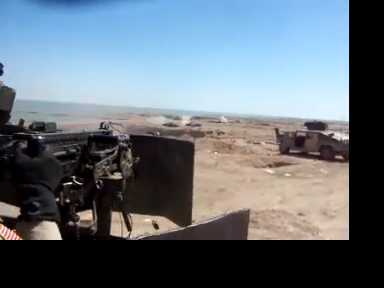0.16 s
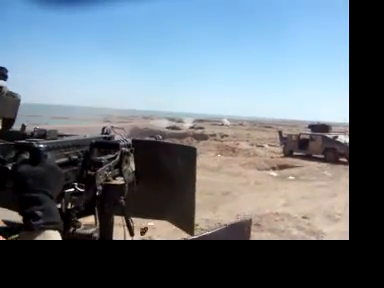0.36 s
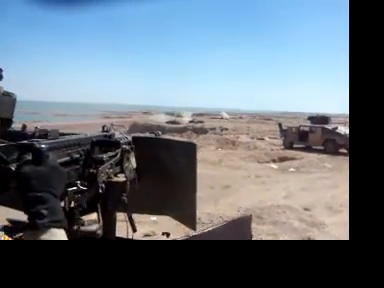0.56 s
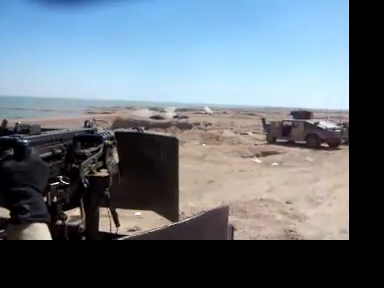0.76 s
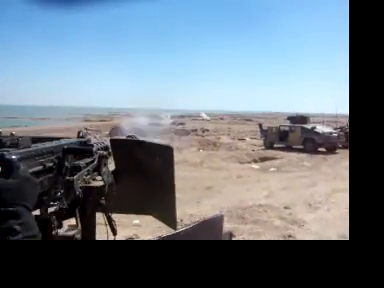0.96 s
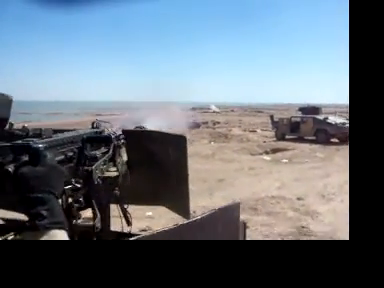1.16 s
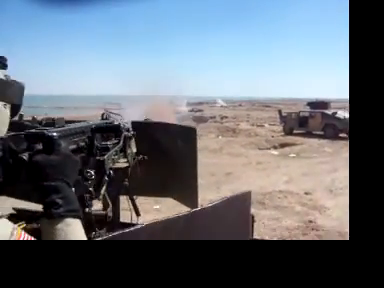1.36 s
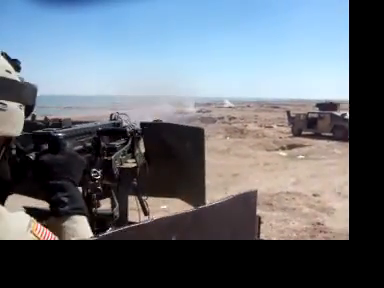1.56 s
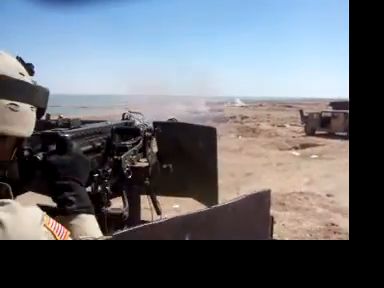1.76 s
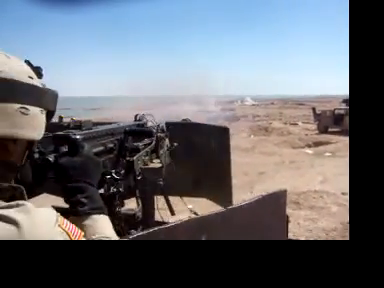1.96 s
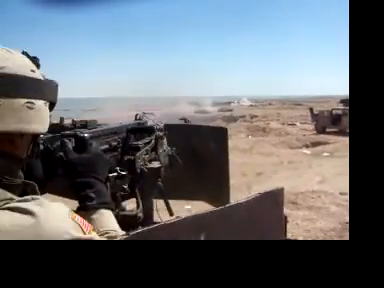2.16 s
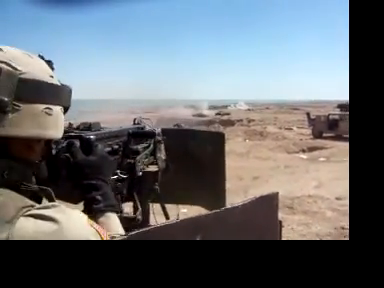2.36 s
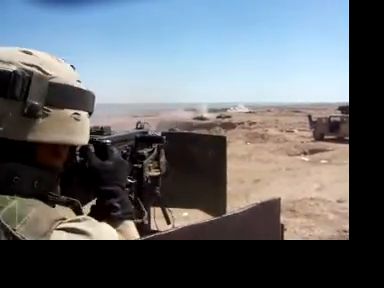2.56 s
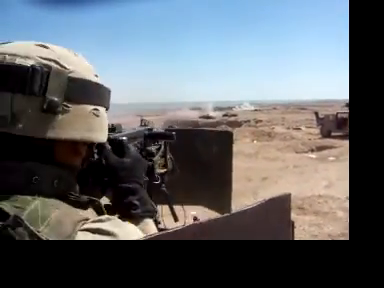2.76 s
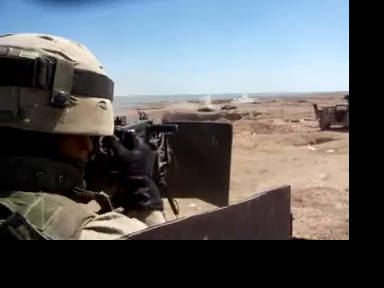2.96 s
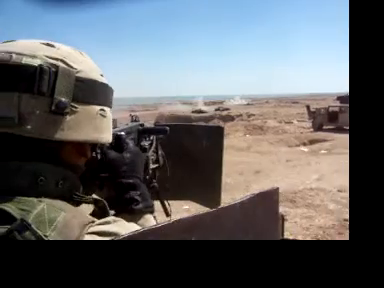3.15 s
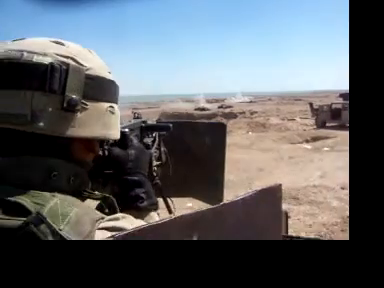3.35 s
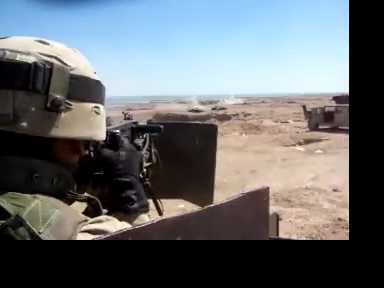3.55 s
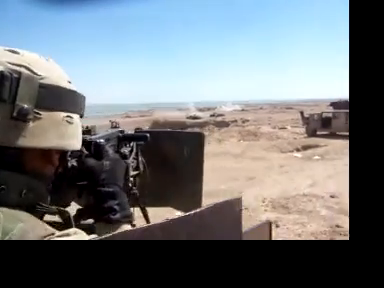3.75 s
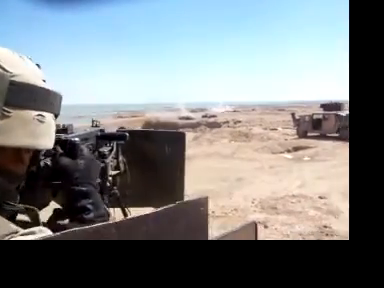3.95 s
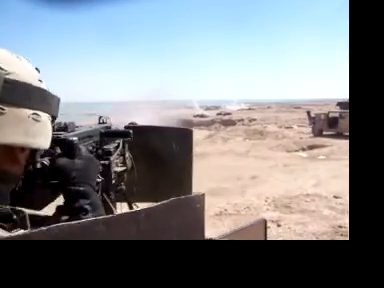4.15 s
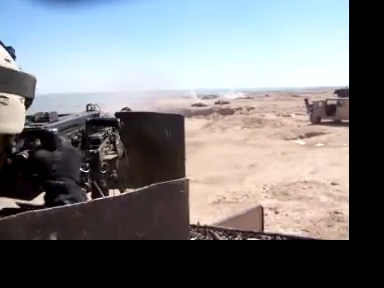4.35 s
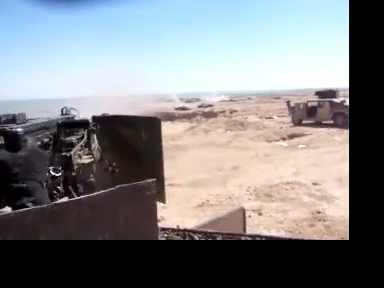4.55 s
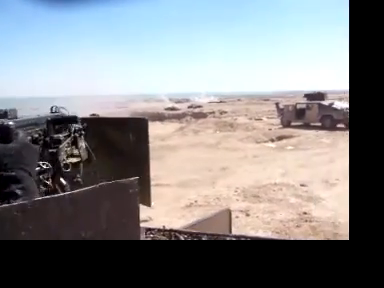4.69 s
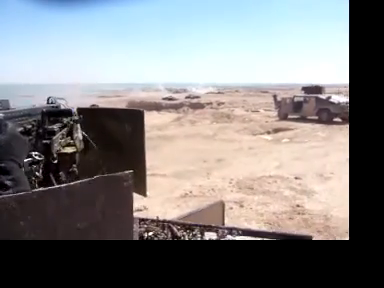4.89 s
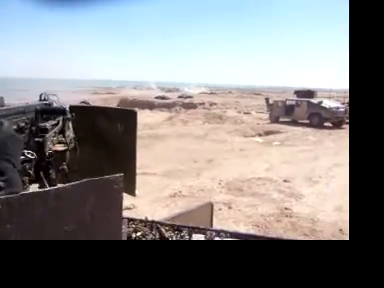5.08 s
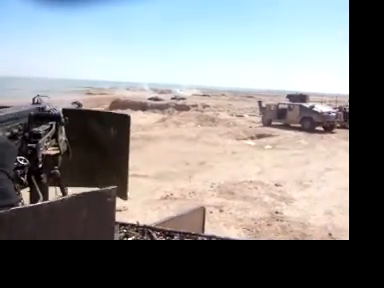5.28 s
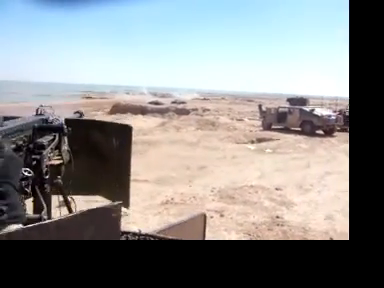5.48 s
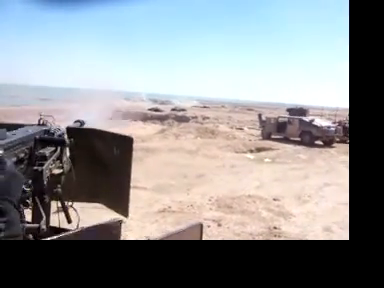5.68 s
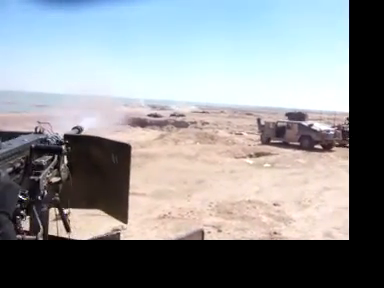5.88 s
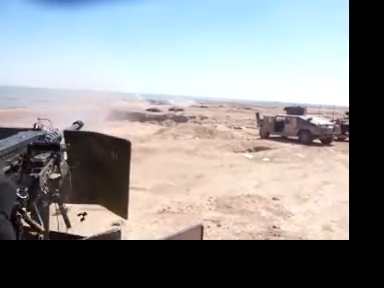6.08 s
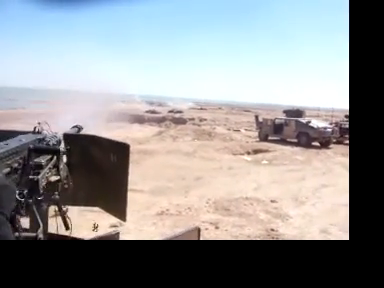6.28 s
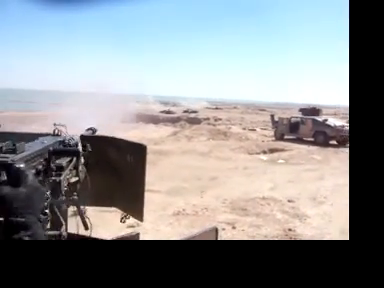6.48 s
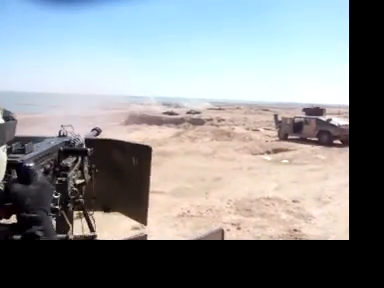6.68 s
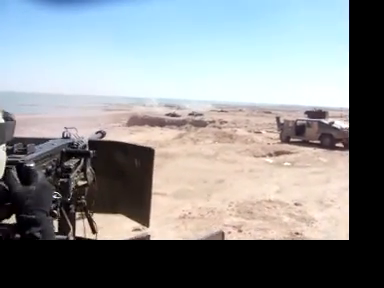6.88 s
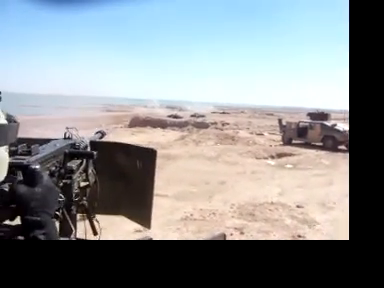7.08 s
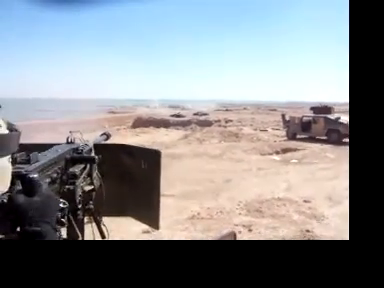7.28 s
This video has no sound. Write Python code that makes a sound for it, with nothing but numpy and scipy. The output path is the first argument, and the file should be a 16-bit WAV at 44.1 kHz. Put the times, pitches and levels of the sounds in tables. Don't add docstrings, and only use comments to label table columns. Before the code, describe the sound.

A mounted heavy gun hammers ten shots, then five, then nine, distorting a close small microphone, with spent cases and links tinkling on armour between bursts.

```python
import sys
import numpy as np
from scipy import signal
from scipy.fft import rfft, irfft
from scipy.io import wavfile
from scipy.ndimage import uniform_filter1d

SR = 44100
rng = np.random.default_rng(int(sys.argv[2]) if len(sys.argv) > 2 else 0)


def decibels_to_gain(level_db):
    exponent = np.asarray(level_db, float) / 20
    return 10 ** exponent


def generate_wav(sig):
    pcm = np.round(np.clip(np.atleast_2d(sig).T, -1, 1) * 32767).astype(np.int16)
    wavfile.write(sys.argv[1], SR, pcm)


N = 324135

# [start_s, level_db]
WIND = [
    (0, -38),
    (.9, -39),
    (2.4, -33),
    (2.8, -35),
    (3.1, -45),
    (3.28, -36),
    (3.6, -41),
    (3.95, -40),
    (5.5, -44),
    (7.35, -35),
]
# [freq_hz, level_db per Hz]
RUMBLE_COLOUR = [(12, -21.5), (20, 5), (48, -3), (81, 2), (141, 1.5), (203, -1), (335, -9), (403, -14.5),
                 (600, -15), (780, -35.5), (1320, -120)]
# [freq_hz, level_db per Hz]
SHELL_COLOUR = [(180, -31.5), (300, 1.5), (396, -6.5), (684, -1), (818, -6.5), (894, -1.5), (1140, -1),
                (1490, -8.5), (1760, -20), (1890, -12), (2630, -3), (3220, -14), (3800, -11.5), (4300, 0),
                (5590, -60.5), (9460, -120)]
# [end_s, echo_db, clatter_db, clatter_fade_db_per_s, settled_s after the end]
BURST_ENDS = [
    (-.08, 1, -19, 28, .92),
    (2.17, -5, -23, 22, 1.28),
    (4.7, -4.5, -19.5, 22, .78),
    (6.659, -4, -18.5, 17, .6),
]
# [echo_db, echo_fade_db_per_s, clatter_db, clatter_fade_share 0-1, resting_db]
LOW_LAYER = (-1, 135, .5, 0.88, -59.5)
MID_LAYER = (-8.5, 158, -0.5, 1.02, -55)
TOP_LAYER = (-13.5, 165, -6.5, 1, -71.5)

# [start_s, peak_db, pitch_hz, t60_s]
CASES = [(.059, -8, 1210, .04), (.117, -17, 1150, .09), (.164, -9, 1330, .03), (.26, -10, 1190, .036),
         (.47, -9, 1340, .05), (.497, -11, 1110, .054), (.584, -17, 1090, .03), (2.187, -15, 1250, .1),
         (2.278, -2, 1110, .066), (2.307, -9.5, 1200, .081), (2.333, -9, 1200, .082),
         (2.433, -8, 1150, .078), (2.459, -9.5, 1030, .065), (2.57, -19, 1180, .13),
         (2.979, -30, 1290, .07), (3.057, -23, 1230, .06), (3.413, -28, 1040, .045),
         (4.904, -8, 1320, .058), (4.974, -7, 910, .15), (5.024, 1.5, 1130, .065), (5.113, -4, 1120, .034),
         (5.184, -13, 1000, .09), (5.247, -15, 982, .12), (6.752, -12, 1020, .07), (6.814, -9, 1130, .043),
         (6.832, -3, 902, .068), (6.915, -17, 964, .1), (6.958, -13, 1020, .09), (6.979, -8, 1030, .054),
         (7.081, -5.5, 1100, .14)]
# [start_s, peak_db, pitch_hz, t60_s]
LINKS = [(.092, -24, 2830, .06), (.307, -23, 2470, .074), (.362, -14, 2720, .03), (.403, -28, 2720, .056),
         (.584, -21, 2450, .03), (2.187, -8, 2740, .12), (2.232, -10, 2930, .034), (2.278, -16, 2580, .066),
         (2.382, -19, 2370, .039), (2.433, -9, 2380, .078), (2.502, -10, 2520, .039),
         (2.824, -21, 3030, .041), (2.888, -21, 2800, .037), (3.057, -20, 2860, .066),
         (3.176, -39, 2180, .055), (3.287, -44, 2500, .08), (3.413, -38, 2640, .05),
         (4.867, -20, 2780, .067), (4.904, -13, 2610, .058), (4.973, -12, 2720, .13),
         (5.025, 0., 2570, .054), (5.114, -10.5, 2610, .034), (5.146, -6, 2830, .036),
         (5.366, -21, 2670, .052), (5.437, -30, 2700, .06), (6.752, -15, 2400, .07),
         (6.834, -5, 2600, .068), (6.894, -22, 2390, .09), (6.979, -9, 2570, .054), (7.081, -12, 2400, .11)]
# [start_s, peak_db, pitch_hz, t60_s]
TUMBLES = [(.47, -19, 781, .06), (.497, -18, 643, .054), (.654, -22, 638, .081), (.764, -20, 638, .04),
           (2.232, -16, 366, .034), (2.459, -15, 764, .065), (2.503, -22, 614, .039),
           (2.592, -23, 501, .09), (2.678, -30, 466, .05), (2.725, -24, 692, .066), (2.824, -26, 627, .041),
           (2.955, -33, 541, .07), (3.174, -33, 724, .058), (3.348, -31, 353, .039), (3.413, -25, 361, .05),
           (3.805, -30, 390, .038), (3.943, -44, 382, .07), (4.781, -18, 484, .09), (4.974, -13, 624, .13),
           (5.025, -4, 673, .06), (5.067, -9, 697, .035), (5.246, -21, 640, .11), (5.347, -24, 651, .069),
           (5.366, -20, 522, .052), (5.532, -22, 598, .1), (6.894, -18, 686, .09), (7.171, -22, 608, .043),
           (7.25, -26, 735, .17), (7.337, -19, 509, .055)]
# [low_db, mid_db, upper_db, strongest_mode_db, rise_s]
CASE_TONE = (-18, -5, -24, -8, .0024)
LINK_TONE = (-19, -16, -2, -7, .0022)
TUMBLE_TONE = (-2.5, -14, -22, -6, .0025)
# [start_s, peak_db, t60_s]
THUDS = [
    (2.849, -32, 0.095),
    (3.267, -13, 0.092),
    (3.411, 1, 0.024),
    (3.448, -14, 0.12),
    (3.782, -9, 0.11),
    (3.802, -3.5, 0.068),
    (7.188, -4, 0.027),
]
# [start_s, level_db, pitch_hz, t60_s]
BRASS_SINGING = [(.6, -52, 3900, .5), (.72, -53, 4050, .3), (2.7, -43, 3650, 1.), (2.9, -48, 4000, .4),
                 (3.08, -50, 1240, 1.5), (3.08, -54, 1510, 1.2), (3.14, -50, 3700, .5),
                 (3.2, -52, 4000, .4), (5.3, -46, 3700, .6), (5.44, -42, 3700, .7), (5.46, -44, 2400, .6),
                 (7.27, -34, 580, .2)]

SHOTS = [.9915, 1.1311, 1.2502, 1.3554, 1.4586, 1.5735, 1.6833, 1.7953, 1.9069, 2.0105, 4.0745, 4.2132,
         4.338, 4.4455, 4.5526, 5.5832, 5.7183, 5.8422, 5.952, 6.0646, 6.1762, 6.2796, 6.3877, 6.4982]
# [delay_s after the trigger, level_db, t60_s, repeating_share 0-1]
CYCLE = [
    (.0008, -7.5, 0.18, 1),
    (.0025, -8.5, 0.077, 0.88),
    (.0048, 30.5, 0.077, .85),
    (0.022, 25, 0.043, 0.9),
    (0.044, 13, 0.079, 0.5),
    (.07, 11.5, 0.11, .3),
    (.098, 12, .1, 0.2),
    (.14, 5.5, 0.058, 0.4),
    (0.171, -12.5, 0.034, 0.07),
]
# [pitch_hz, level_db, delay_s after the trigger, t60_s]
SHIELD_PING = (890, 39.8, .006, 0.029)
# [pitch_hz, level_db, t60_s]
HULL = [(92, 11, 0.67), (124.74, 10, 0.55), (178.93, 13.5, 0.48), (199, 22.5, 0.48), (244, 11.5, 0.56),
        (299.2, 9, 0.35), (346.4, 19.5, 0.43), (406, 11, 0.49), (482.4, 10.5, 0.41), (562.7, 15.5, 0.28),
        (682, 18, 0.14), (748, 14, 0.3), (1110, 19.5, 0.17)]
# [freq_hz, level_db per Hz]
GROUND_COLOUR = [(40, -11), (85, 0), (200, 1.5), (350, 0), (600, -4.5), (1000, -14.5), (2000, -46.5)]
LAST_SHOT_REST = {2.0105: .187, 4.5526: .168, 6.4982: .177}


def evened(x):
    return x / np.sqrt(np.mean(x ** 2) + 1e-20)


def add(mix, s, sound):
    part = mix[round(s * SR):][:len(sound)]
    part += sound[:len(part)]


def coloured(x, points, lo_hz=0, hi_hz=30000):
    hz = np.fft.rfftfreq(x.shape[-1], 1 / SR) + 1
    f, db = np.transpose(points)
    band = 1 / np.sqrt((1 + (lo_hz / hz) ** 8) * (1 + (hz / hi_hz) ** 8))
    gain = decibels_to_gain(np.interp(np.log(hz), np.log(f), db)) * band
    return evened(irfft(rfft(x) * gain, x.shape[-1]))


def strike(t, t60, rise_s=0.0024):
    t = np.maximum(t, 0)
    return (1 - np.exp(-t / rise_s)) * decibels_to_gain(-60 * t / t60)


def aftermath(t, echo_share_db, echo_fade, clatter_share_db, clatter_share, rest_db):
    settle_db, settle_s = -7, .03
    power = decibels_to_gain(2 * rest_db)
    for end, echo_db, clatter_db, fade, settled in BURST_ENDS:
        since = np.maximum(t - end, 0)
        on = np.clip((t - end) / .05 + 1, 0, 1)
        echo = decibels_to_gain(echo_db + echo_share_db - echo_fade * since)
        settling = settle_db / (1 + np.exp(np.minimum((settled - since) / settle_s, 50)))
        clatter = decibels_to_gain(clatter_db + clatter_share_db - fade * clatter_share * since + settling)
        power = power + on ** 2 * (echo ** 2 + clatter ** 2)
    return power


def wind_and_fades():
    t = np.arange(N) / SR
    slow = t[::128]
    tick_level = decibels_to_gain(1.8 * np.minimum(rng.exponential(1, N), 4))
    ticks = tick_level * (rng.random(N) < 150 / SR)
    lumps = .5 + evened(signal.oaconvolve(ticks, strike(t[:3000], 0.12))[:N])
    rattle = lumps * rng.standard_normal(N)
    drift = uniform_filter1d(uniform_filter1d(rng.standard_normal(N), 1500), 1500)
    gusts = decibels_to_gain(1.5 * evened(drift))
    rumble = coloured(gusts * rng.standard_normal(N), RUMBLE_COLOUR)
    mid_rattle = coloured(rattle, SHELL_COLOUR, 450, 1750)
    top_rattle = coloured(rattle, SHELL_COLOUR, 1750)
    wind_power = decibels_to_gain(2 * np.interp(slow, *np.transpose(WIND)))
    low_power = aftermath(slow, *LOW_LAYER) + wind_power
    mid_power, top_power = aftermath(slow, *MID_LAYER), aftermath(slow, *TOP_LAYER)
    out = np.zeros(N)
    for power, layer in ((low_power, rumble), (mid_power, mid_rattle), (top_power, top_rattle)):
        out += np.interp(t, slow, np.sqrt(power)) * layer
    return out


def clinks(noise):
    t = np.arange(noise.shape[1]) / SR
    shape = (len(noise), 26, 1)
    hz, phase = rng.uniform(300, 4000, shape), rng.random(shape)
    modes = sum(np.sin(2 * np.pi * (hz[:, k] * t + phase[:, k])) for k in range(26))
    return modes / 4 + .65 * noise


def metal_landings(rows, tone):
    low_db, mid_db, high_db, mode_db, rise_s = tone
    linger_db, linger = -17, 3.3
    t, out = np.arange(SR // 6) / SR, np.zeros(N)
    raw = clinks(rng.standard_normal((len(rows), len(t))))
    for (s, db, hz, t60), ring in zip(rows, raw):
        body = decibels_to_gain(mid_db) * coloured(ring, SHELL_COLOUR, 820, 1700)
        body += decibels_to_gain(low_db) * coloured(ring, SHELL_COLOUR, 300, 820)
        body += decibels_to_gain(high_db) * coloured(ring, SHELL_COLOUR, 1700)
        body += decibels_to_gain(mode_db) * np.sin(2 * np.pi * hz * t)
        envelope = strike(t, t60, rise_s) + .3 * strike(t - .008, t60, rise_s)
        envelope += decibels_to_gain(linger_db) * strike(t, linger * t60, .01)
        add(out, s - .001, decibels_to_gain(db) * body * envelope)
    return out


def hull_thuds():
    t, out = np.arange(SR // 6) / SR, np.zeros(N)
    for (s, db, t60), puff in zip(THUDS, rng.standard_normal((len(THUDS), len(t)))):
        knock = coloured(puff, RUMBLE_COLOUR, 62, 750) * strike(t, t60, 0.0045)
        add(out, s - .002, decibels_to_gain(db - 12.5) * knock)
    return out


def singing_brass():
    t, out = np.arange(SR // 2) / SR, np.zeros(N)
    for s, db, hz, t60 in BRASS_SINGING:
        add(out, s, decibels_to_gain(db) * np.sin(2 * np.pi * hz * t) * strike(t, t60, .004))
    return out


def falling_brass():
    landings = metal_landings(CASES, CASE_TONE) + metal_landings(LINKS, LINK_TONE)
    landings += metal_landings(TUMBLES, TUMBLE_TONE)
    return landings + hull_thuds() + singing_brass()


def hull_modes(t):
    hz, db, t60 = np.transpose(HULL + HULL)[..., None]
    hz = hz * (1 + .02 * rng.uniform(-1.1, 1, hz.shape))
    db = db + np.repeat([3, -4], len(HULL))[:, None]
    turn = 2 * np.pi * (hz * t + rng.random(hz.shape))
    rise_s = .021 + 3. / hz
    bloom = (1 - np.exp(-t / rise_s)) ** 4 * decibels_to_gain(db - 60 * t / t60)
    return bloom * np.sin(turn), bloom * np.cos(turn)


def gun():
    t, out = np.arange(SR * 2 // 5) / SR, np.zeros(N)
    noise_shape = (len(SHOTS) + 1, len(t))
    same, *fresh = coloured(rng.standard_normal(noise_shape), SHELL_COLOUR)
    same_roll, *fresh_roll = coloured(rng.standard_normal(noise_shape), GROUND_COLOUR)
    sines, cosines = hull_modes(t)
    roll_db, roll_rise_s, roll_t60 = 23, 0.028, 0.45
    swell = (1 - np.exp(-t / roll_rise_s)) ** 4 * decibels_to_gain(roll_db - 60 * t / roll_t60)
    ping_hz, ping_db, ping_s, ping_t60 = SHIELD_PING
    ping = decibels_to_gain(ping_db) * strike(t - ping_s, ping_t60, 0.0066) * np.sin(2 * np.pi * ping_hz * t)
    stages = np.array([decibels_to_gain(db) * strike(t - at, t60, 0.0012) for at, db, t60, _ in CYCLE])
    kept = np.clip(np.transpose(CYCLE)[-1], 0, 1)
    repeating_crack = kept @ stages * same
    chance = np.sqrt(1 - kept ** 2) @ stages
    gaps = np.diff(SHOTS, append=N / SR)
    rests = [LAST_SHOT_REST.get(s, gap + .004) for s, gap in zip(SHOTS, gaps)]
    scatters = .3 * rng.standard_normal((len(SHOTS), len(sines)))
    for s, rest, new, new_roll, scatter in zip(SHOTS, rests, fresh, fresh_roll, scatters):
        boom = np.cos(scatter) @ sines + np.sin(scatter) @ cosines
        boom += swell * (.93 * same_roll + .36 * new_roll)
        damping = decibels_to_gain(-20 / (1 + np.exp((rest - t) / .005)))
        add(out, s, repeating_crack + chance * new + ping + damping * boom)
    return out


def scene():
    fade_in = np.minimum(np.arange(N) / 100, 1)
    return ((gun() + falling_brass() + wind_and_fades()) * fade_in)[None]


def top_cut(x):
    return signal.sosfilt(signal.butter(12, 16820, fs=SR, output="sos"), x)


def record(dry):
    overload = np.maximum(uniform_filter1d(abs(dry), 301, origin=150) - .6, 0)
    biased = dry - .3 * overload
    rail = np.where(biased > 0, .77, .53)
    preamp = biased / (1 + abs(biased / rail) ** 4) ** (1 / 4)
    leak = np.exp(-2 * np.pi * 17 / SR)
    coupled = signal.lfilter([1, -1], [1, -leak], preamp)
    stored = np.clip(signal.resample_poly(coupled, 80, 441, axis=1), -.75, .69)
    smooth = signal.firwin(441 * 30 + 1, .98 / 441, window=("kaiser", 10))
    played = signal.resample_poly(stored, 441, 80, axis=1, window=smooth)
    played = np.pad(played, ((0, 0), (0, 500)))[:, :N]
    edge = signal.firwin(401, 15850, window=("kaiser", 9), fs=SR)  # low-pass, Hz
    mix = signal.oaconvolve(np.clip(played, -.8, .705), edge[None], "same")
    return top_cut(mix)


dry = scene()
out = record(dry)
generate_wav(out)
```